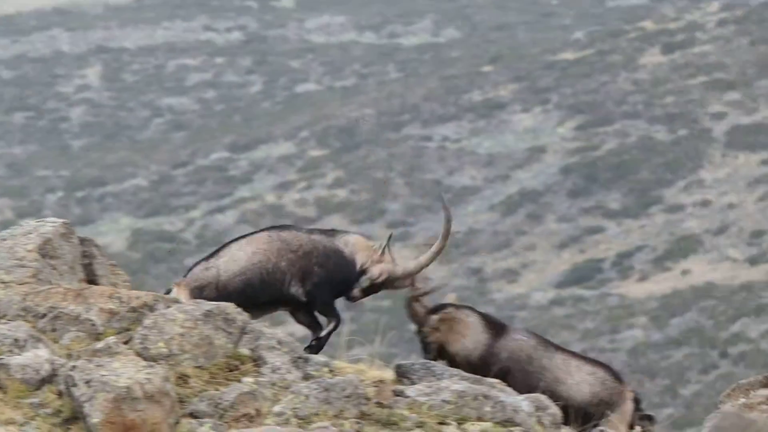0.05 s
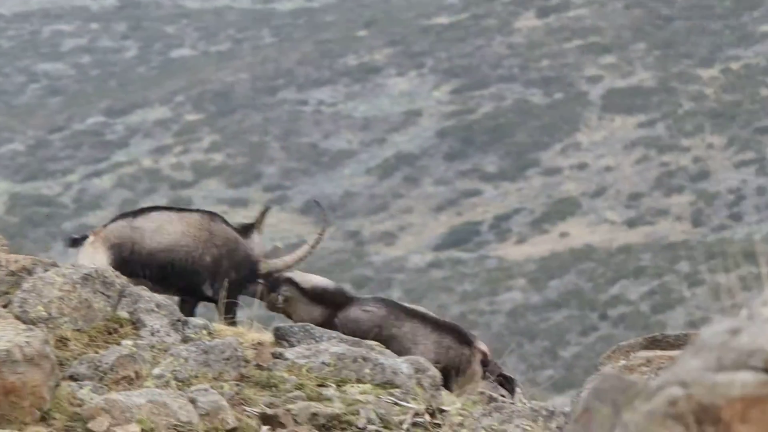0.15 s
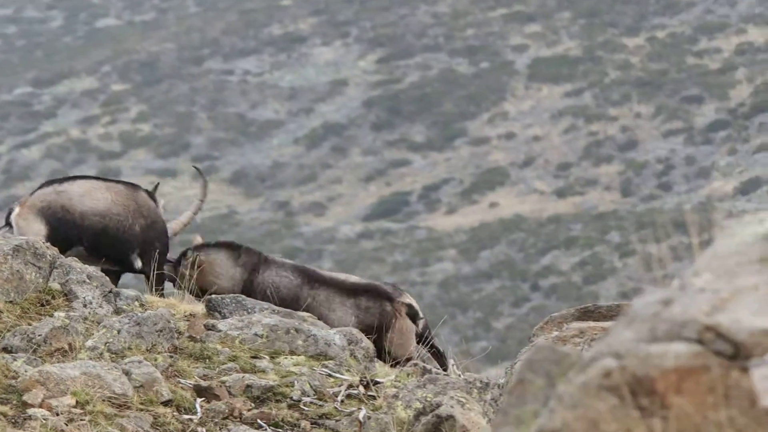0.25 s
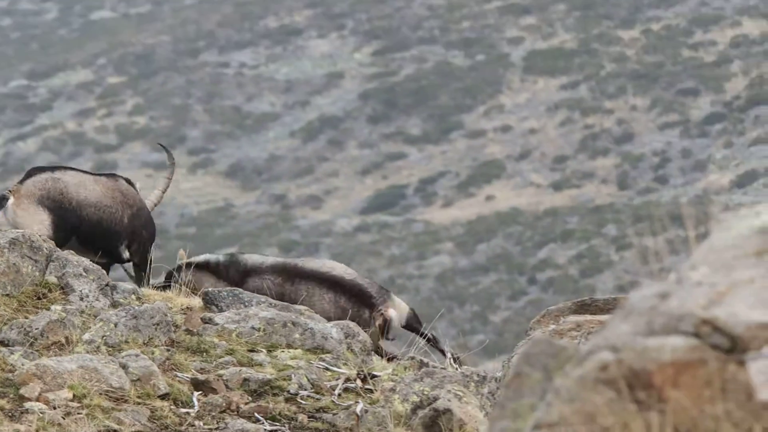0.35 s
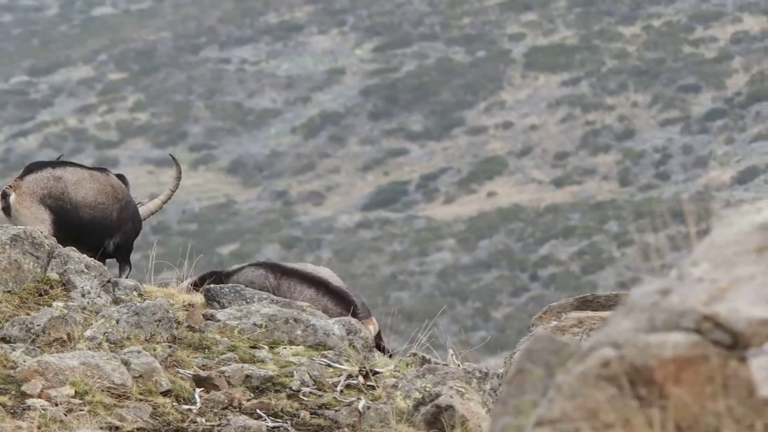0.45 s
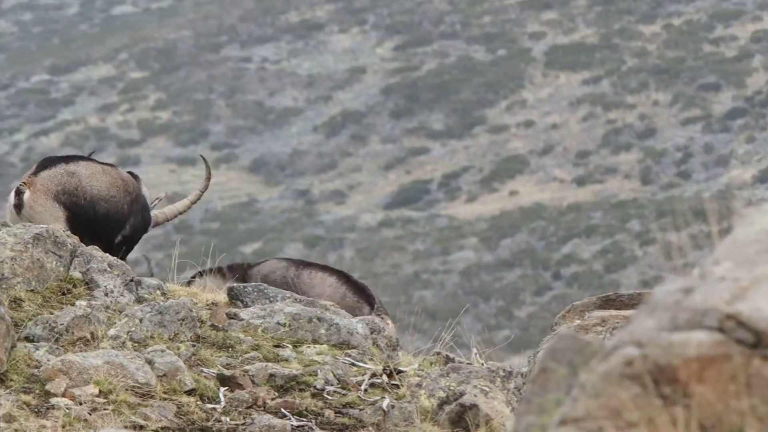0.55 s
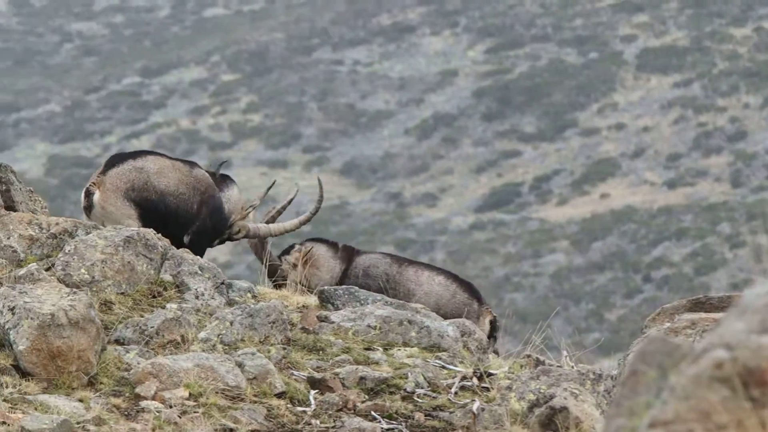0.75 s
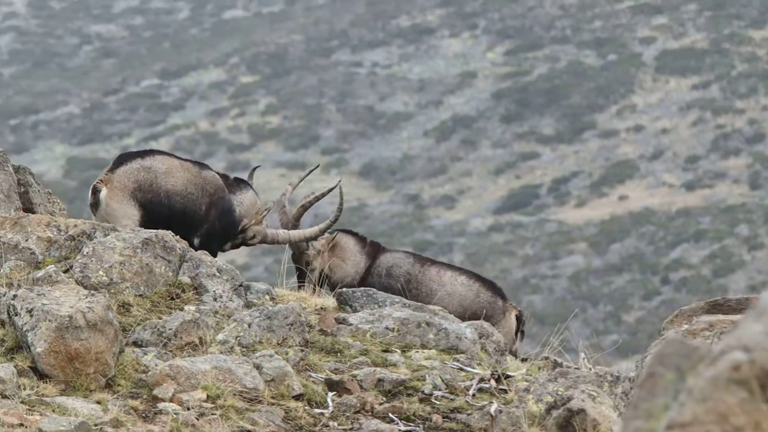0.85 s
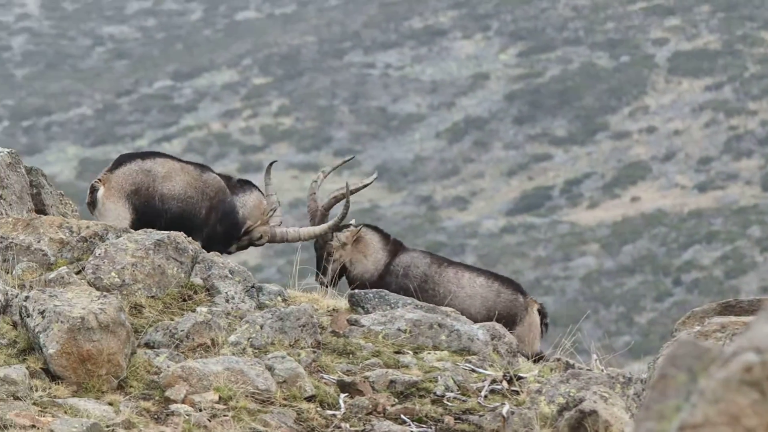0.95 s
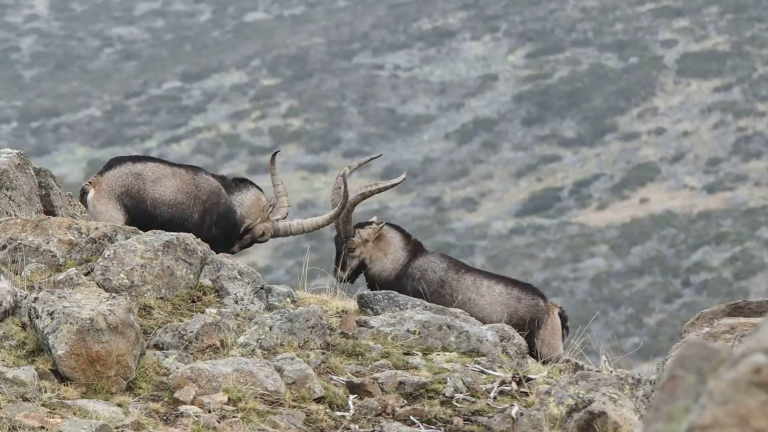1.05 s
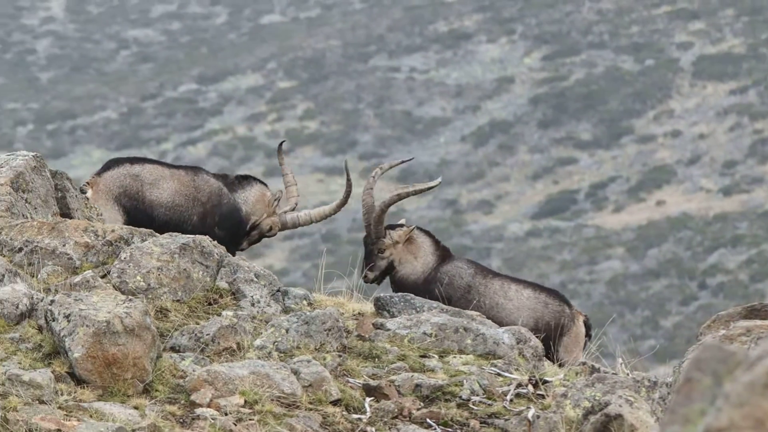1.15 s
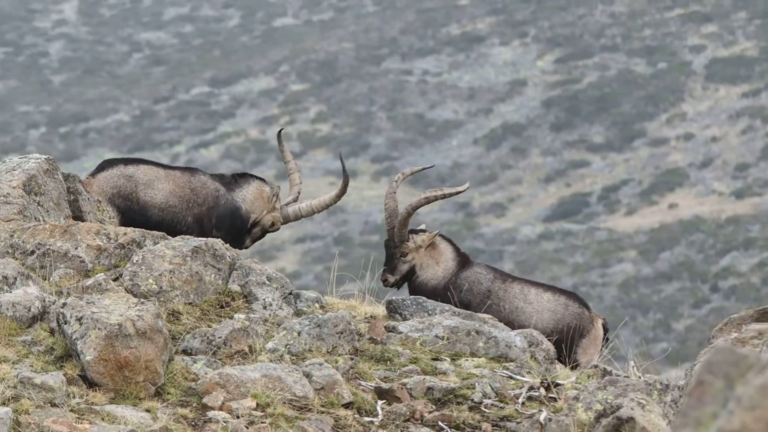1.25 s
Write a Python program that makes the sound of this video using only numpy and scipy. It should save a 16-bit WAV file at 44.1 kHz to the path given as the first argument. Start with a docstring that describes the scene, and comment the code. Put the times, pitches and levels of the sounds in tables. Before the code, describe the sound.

Two wild goats crack their horns together sharply, some way off on a rocky mountainside. Weaker hoof knocks, dull thuds and gritty scrapes follow, over faint wind and rustling dry grass.

```python
"""On a rocky mountainside, some way off, two wild goats crack their horns together.
The horns hit, rebound and ring briefly; the boulders scatter the crack and a far slope returns it faintly.
Hooves then knock on the rock, scrape over grit, kick stones and thud on turf, and the horns tap again.
Behind it all are faint wind, rustling dry grass and a low wavering hum."""
import sys
import numpy as np
from scipy import signal
from scipy.fft import rfft, irfft
from scipy.io import wavfile
from scipy.ndimage import uniform_filter1d

SR = 44100
rng = np.random.default_rng(int(sys.argv[2]) if len(sys.argv) > 2 else 0)


def waveform_to_disk(signal):
    """Save audio, clipped to [-1, 1], as 16-bit WAV at the path in sys.argv[1]."""
    frames = np.transpose(np.atleast_2d(signal))
    scaled = np.clip(frames, -1, 1) * 32767
    samples = np.round(scaled).astype(np.int16)
    wavfile.write(sys.argv[1], SR, samples)


N = 57330
T = np.arange(N) / SR

# horn blows: start_s, level_db, pitch_ratio, brightness_db_per_octave
HORN_BLOWS = [(0.2048, 0, 1.0, 0.2), (0.2122, -6.5, 0.95, 0.9), (0.2137, -12, 1.02, -0.8),
              (0.8092, -32, 1.0, 2.5)]
# tones of a struck horn: pitch_hz, width_hz, level_db, left_over_right_db
HORN_TONES = [(345, 230, 6.5, 1.5), (774, 144, 13.5, 1), (971, 47, 15.5, -1), (1524, 213, 19.5, 1),
              (1755, 280, 15, -10), (1940, 290, 16, -4.5), (2240, 180, 11.5, -16), (2790, 62, 11, -4),
              (3057, 227, 11.5, -4.5), (3920, 250, 7.5, -5.5), (4315, 330, 4.5, 0), (5200, 800, -14, 15),
              (8200, 3000, -28, -1)]
# longer ring of the hollow horns: pitch_hz, level_db, fade_s (time to fall by 60 dB)
HORN_RINGING = [(870, -44, 0.026), (1060, -32, 0.04), (1470, -60, 0.036), (2196, -39, 0.11),
                (3280, -56, 0.054), (3680, -24, 0.021), (4300, -31, 0.021)]
# hoof knocks: start_s, level_db, pitch_ratio, brightness_db_per_octave, left_over_right_db
HOOF_KNOCKS = [(0.256, -11, 1.64, 1, -4), (0.2578, 0.5, 1.12, -6, -0.5), (0.2621, -10, 1.124, -5, 0),
               (0.4981, -6.5, 1.14, 0, 1), (0.5311, -18, 1.09, 5, -3), (0.5623, -8.5, 0.827, 3.5, -4),
               (0.5641, -4, 1.07, -5.5, 1), (0.6507, -21.5, 0.96, 8.5, 2), (0.8114, -22.5, 1.07, -1.5, 0),
               (1.1948, -10, 0.96, 5, 3)]
# tones of hoof on rock: pitch_hz, width_hz, level_db, left_over_right_db
HOOF_TONES = [(400, 590, -13.5, 3), (1050, 192, 8, 1.5), (1445, 140, -0.5, 2), (1930, 370, -2.5, -4),
              (2760, 330, -11.5, -9), (4160, 940, -22.5, 1), (7040, 7100, -35.5, 8)]
# weight landing on turf: start_s, level_db, pitch_ratio
TURF_THUDS = [(0.2075, 2, .66), (0.277, 0, .33), (0.485, -8, .4), (0.565, -8, .5), (0.812, -11, .4),
              (1.0005, 0.5, 1.02)]
# tones of the turf: pitch_hz, width_hz, level_db, left_over_right_db
TURF_TONES = [(80, 70, -8, 0), (205, 65, 0, 0), (450, 240, -13, 0), (900, 700, -28, 0)]
# loose stones clacking: start_s, level_db, pitch_hz, swell_s, left_over_right_db
STONE_CLACKS = [(0.2205, -26.5, 1097, 0.0024, 2.5), (0.3598, -38.5, 1600, 0.0017, -8.5),
                (0.3618, -43.5, 992, 0.0035, -7), (0.3670, -38.5, 1750, 0.0007, -4),
                (0.3675, -51, 1130, 0.0024, -11), (0.4635, -40.5, 1075, 0.0015, 3),
                (0.4730, -38, 1406, 0.0027, 4.5), (0.4958, -40, 2060, 0.0022, -9),
                (0.5625, -40, 2152, 0.0013, -13.5), (0.5659, -50.5, 1090, 0.0035, -3),
                (0.8092, -50, 2920, 0.00034, -6), (0.8095, -53, 2080, 0.0021, -6),
                (1.1942, -39, 2090, 0.00072, -7)]
# hooves sliding: middle_s, half_length_s, level_db, brightness_db_per_octave
HOOF_SLIDES = [(0.008, 0.012, -53, -12.5), (0.057, 0.0037, -50, 7), (0.102, 0.0052, -50.5, 11.5),
               (0.239, 0.0075, -41, -6), (0.2587, 0.002, -45.5, 10), (0.313, 0.024, -50.5, 6.5),
               (0.344, 0.017, -53, 6), (0.385, 0.0085, -53, 12.5), (0.412, 0.0042, -54, 16),
               (0.468, 0.013, -48.5, -2.5), (0.499, 0.015, -42.5, 2), (0.999, 0.015, -58, -7.5)]
# tones of grit under a hoof: pitch_hz, width_hz, level_db, left_over_right_db
GRIT_TONES = [(766, 205, 1.5, -4), (1090, 106, 2.5, -2), (1467, 110, 0.5, -4), (2000, 720, -3, -12.5),
              (3270, 1070, -11.5, -3), (7600, 4600, -37.5, 16)]
# how long the boulders echo: pitch_hz, fade_s
BOULDER_FADE = [(200, 0.51), (600, 0.39), (1300, 0.046), (2400, 0.029), (4000, 0.08), (9000, 0.029)]
# how long the far slope echoes: pitch_hz, fade_s
SLOPE_FADE = [(200, 0.15), (1200, 0.79), (3000, 1), (8000, 0.4)]
# wind from bass to treble: pitch_hz, level_db
WIND_COLOUR = [(20, 6), (40, -20.5), (70, -10), (130, -7.5), (190, 1.5), (280, 1), (480, -6.5),
               (1000, -7.5), (2200, -10), (3500, -14), (6500, -20.5), (9000, -19.5), (15500, -24)]
# how alike left and right are in wind and grass: pitch_hz, likeness (0 to 1)
STEREO_LIKENESS = [(50, 0.94), (300, 0.58), (1000, 0.43), (2500, 0.02), (5000, 0), (15000, 0)]
# loudness of the dry grass: time_s, level_db
GRASS_LEVEL = [(0, -50), (.12, -57), (.2, -56.5), (.42, -58.5), (.56, -65), (.74, -67.5), (1.3, -64)]
# dry grass from bass to treble: pitch_hz, level_db
GRASS_COLOUR = [(100, -11.5), (500, -7.5), (1000, -2), (2000, 1.5), (3800, -4.5), (5500, -8.5), (9000, -12),
                (15500, -25)]
# course of the hum: time_s, level_db, pitch_hz
HUM_PATH = [(0, -69, 240), (0.071, -59.5, 225.2), (0.13, -60, 301.2), (0.199, -77, 291),
            (0.299, -57.5, 199.8), (0.385, -74, 213.3), (0.435, -54, 217.7), (0.524, -62, 214.5),
            (0.544, -50, 207.2), (.565, -68, 213), (0.588, -50.5, 215.9), (0.636, -55.5, 215.5),
            (0.674, -73, 217.9), (0.809, -63, 256.5), (.85, -67.5, 234.7), (.9, -61.5, 209.6),
            (1.0, -63.5, 207.7), (1.1, -84, 224.8), (1.3, -61.5, 216)]

LEAD_SAMPLES = 24  # a blow fades in for this long before its peak
TREBLE_LAG_S_PER_OCTAVE = 0.000181  # bending waves spread a blow out in time
GRAINS_PER_S, GRAIN_SPREAD_DB = 2500, 3
WIND_DB, GUST_DB = -56, 0.7
HUM_WAVER_HZ = 7


def horns():
    """Horns crack together and rebound; being hollow, they ring briefly after the first blow."""
    crack, ring, t = np.zeros((2, N)), np.zeros((2, N)), T[:SR // 4]
    for start_s, db, pitch, bright_db in HORN_BLOWS:
        add(crack, start_s - LEAD_SAMPLES / SR, amp(db) * strike(HORN_TONES, pitch, bright_db))
    tones = sum(amp(db - 60 * t / fade_s) * np.sin(2 * np.pi * hz * t) for hz, db, fade_s in HORN_RINGING)
    fade_in = 1 - np.exp(-t / 0.00059)
    add(ring, HORN_BLOWS[0][0], tones * fade_in)
    return crack, ring


def hooves():
    """Hooves hit rock with short, dead knocks."""
    out = np.zeros((2, N))
    for start_s, db, pitch, bright_db, pan in HOOF_KNOCKS:
        knock = strike(HOOF_TONES, pitch, bright_db)
        add(out, start_s - LEAD_SAMPLES / SR, amp(db) * sides(pan) * knock)
    return out


def thuds():
    """A goat's weight lands on soft ground with a dull thud."""
    out = np.zeros((2, N))
    for start_s, db, pitch in TURF_THUDS:
        add(out, start_s, amp(db) * strike(TURF_TONES, pitch, bright_db=0))
    return out


def stones():
    """Each kicked stone gives a tone that swells and dies in a few milliseconds."""
    out, t = np.zeros((2, N)), T[:SR // 20]
    for start_s, db, hz, swell_s, pan in STONE_CLACKS:
        swell = t / swell_s * np.exp(1 - t / swell_s)
        add(out, start_s, amp(db) * sides(pan) * swell * np.sin(2 * np.pi * hz * t))
    return out


def scrapes():
    """A sliding hoof is rattled by a swell of tiny hits from the grit."""
    out = np.zeros((2, N))
    for middle_s, half_s, db, bright_db in HOOF_SLIDES:
        hits = (rng.random(N) < GRAINS_PER_S / SR) * rng.choice([-1, 1], N)
        grains = hits * amp(GRAIN_SPREAD_DB * rng.standard_normal(N))
        click = strike(GRIT_TONES, 1, bright_db)
        rub = unit(signal.fftconvolve(grains[None], click, axes=1)[:, :N])
        swell = np.exp(-((T - middle_s) / half_s) ** 2)
        out += amp(db) * rub * swell
    return out


def strike(tones, pitch, bright_db, size=4096):
    """One sharp blow sets off a body's quickly dying tones; the treble arrives slightly late."""
    hz = abs(np.fft.fftfreq(size, 1 / SR))
    power = sum((amp(db) * sides(pan)) ** 2 / (1 + ((hz - centre * pitch) / (width * pitch)) ** 2) ** 3
                for centre, width, db, pan in tones)
    octaves = np.log2(np.clip(hz, 500, 6000) / 1400)
    bass_cut = (hz ** 2 + 1) / (hz ** 2 + 40 ** 2)
    log_gain = np.log(np.sqrt(power) * amp(bright_db * octaves) * bass_cut + 1e-4)
    lag = 2 * np.pi * np.cumsum(TREBLE_LAG_S_PER_OCTAVE * np.maximum(octaves, 0)) * SR / size
    # the Hilbert step packs the sound at the start, as in a real hit
    spectrum = np.exp(np.conj(signal.hilbert(log_gain)) - 1j * lag)
    blow = irfft(spectrum[:, :size // 2 + 1])
    fade_in = np.minimum(np.arange(size // 2) / LEAD_SAMPLES, 1) ** 2
    return np.roll(blow, LEAD_SAMPLES, axis=1)[:, :size // 2] * fade_in


def echoes(sound, fades, delay_s, rise_s, alike, size=128):
    """Rock throws back many small echoes after a delay; each pitch fades at its own rate."""
    t = T[:SR * 3 // 5]
    bounces = rng.choice([-1., 1.], (2, len(t))) * (rng.random((2, len(t))) < 1 / 6)
    hz, when, bands = signal.stft(pair(*bounces, alike), SR, nperseg=size)
    bands = bands * amp(-60 * when / read(fades, hz)[:, None])
    tail = signal.istft(bands, SR, nperseg=size)[1][:, :len(t)]
    spectrum = rfft(tail * (1 - np.exp(-t / rise_s)))
    spectrum /= np.sqrt(uniform_filter1d(abs(spectrum) ** 2, size=400, axis=1))  # even out bass and treble
    tail = irfft(spectrum)[:, :len(t) - SR // 50]
    out = np.zeros((2, N))
    add(out, delay_s, signal.fftconvolve(sound, tail, axes=1))
    return out


def wind():
    """Faint wind rushes with a slight flutter."""
    return amp(WIND_DB + GUST_DB * drift(36)) * noise(WIND_COLOUR)


def grass():
    """Dry grass rustles a little to the right and dies down."""
    level_db = np.interp(T, *np.transpose(GRASS_LEVEL)) + 2.43 * drift(93)
    return amp(level_db) * sides(-4.1) * noise(GRASS_COLOUR)


def hum():
    """One low tone wavers in pitch and loudness."""
    time_s, db, hz = np.transpose(HUM_PATH)
    pitch_hz = np.interp(T, time_s, hz) + HUM_WAVER_HZ * drift(29)
    level_db = np.interp(T, time_s, db) + 1.1 * drift(30)
    return amp(level_db) * unit(np.sin(2 * np.pi * np.cumsum(pitch_hz) / SR))


def noise(colour):
    """Stereo noise of a given colour, with both sides nearly the same in the bass."""
    hz = np.fft.rfftfreq(N, 1 / SR)
    a, b = rfft(rng.standard_normal((2, N)))
    spectrum = pair(a, b, read(STEREO_LIKENESS, hz)) * amp(read(colour, hz))
    return unit(irfft(spectrum, N))


def drift(rate_hz):
    """A smooth random wander of typical size 1."""
    hz = np.fft.rfftfreq(2 * N, 1 / SR)
    spectrum = rfft(rng.standard_normal(2 * N)) * np.exp(-(hz / rate_hz) ** 2)
    return unit(irfft(spectrum)[:N])


def pair(a, b, alike):
    """Blends two unrelated sounds into a left and right of a given likeness."""
    shared, apart = a * np.sqrt((1 + alike) / 2), b * np.sqrt((1 - alike) / 2)
    return np.array([shared + apart, shared - apart])


def sides(db):
    """Left and right gains that make the left louder by db."""
    return amp(np.array([[db], [-db]]) / 2)


def amp(db):
    """Turns decibels into a gain to multiply by."""
    return 10 ** (np.asarray(db) / 20)


def unit(x):
    """Scales a sound to an average strength (rms) of 1."""
    return x / np.sqrt(np.mean(x ** 2) + 1e-20)


def read(table, hz):
    """Looks up a pitch in a table, sliding between its rows."""
    row_hz, value = np.transpose(table)
    return np.interp(np.log(hz + 1), np.log(row_hz + 1), value)


def add(mix, start_s, sound):
    """Adds a sound to the stereo mix at a given time."""
    part = mix[:, max(round(start_s * SR), 0):][:, :sound.shape[-1]]
    part += sound[..., :part.shape[1]]


def scene():
    """Horns and hooves among boulders, facing a far slope."""
    crack, ring = horns()
    feet = hooves() + stones() + scrapes()
    boulders = amp(-8.5) * echoes(crack, BOULDER_FADE, delay_s=0.001998, rise_s=0.000093, alike=1.0)
    boulders += amp(-13) * echoes(feet, BOULDER_FADE, delay_s=0.0019, rise_s=0.00026, alike=0.77)
    slope = amp(-22) * echoes(crack + feet, SLOPE_FADE, delay_s=0.034, rise_s=0.0059, alike=0.47)
    return crack + ring + feet + thuds() + boulders + slope + wind() + grass() + hum()


def record(dry):
    """Cuts the very highest treble, above 15900 Hz."""
    treble_cut = signal.firwin(511, 15900, window=("kaiser", 9), fs=SR)
    return signal.oaconvolve(dry, treble_cut[None], "same")


dry = scene()
out = record(dry)
waveform_to_disk(out)
```